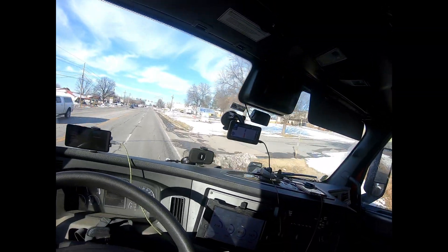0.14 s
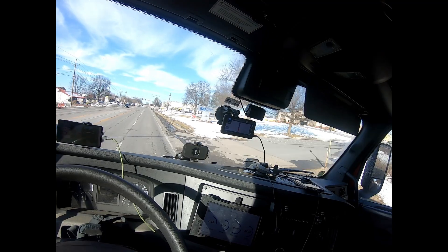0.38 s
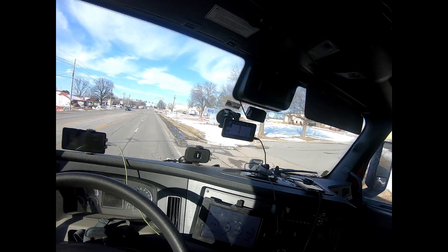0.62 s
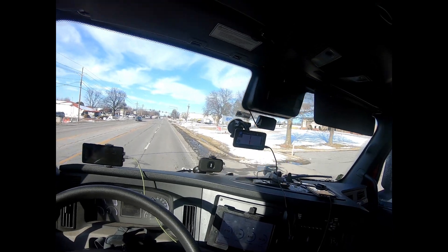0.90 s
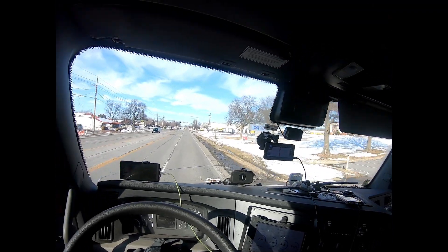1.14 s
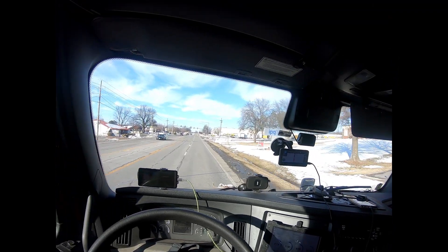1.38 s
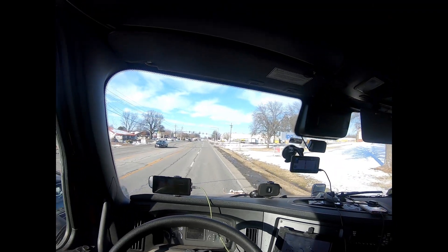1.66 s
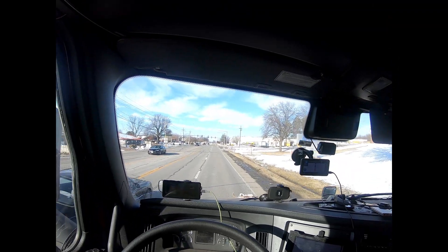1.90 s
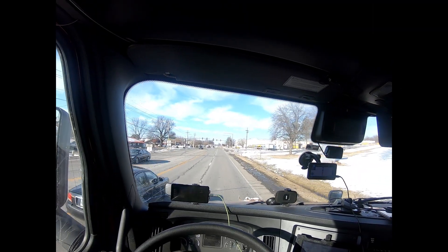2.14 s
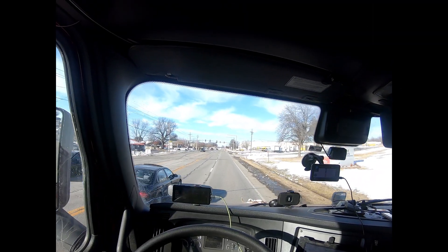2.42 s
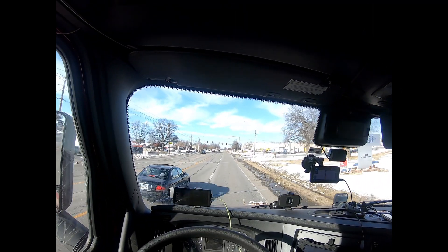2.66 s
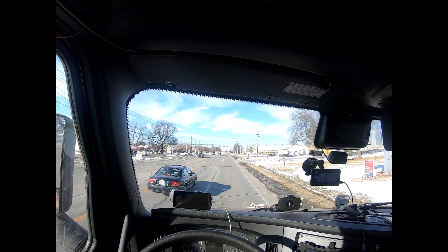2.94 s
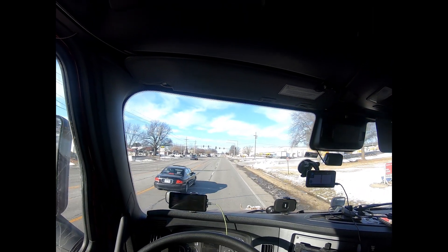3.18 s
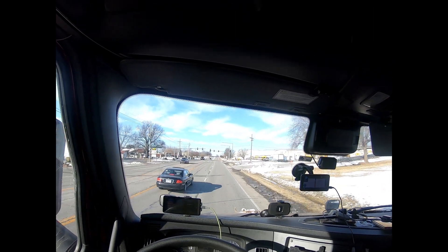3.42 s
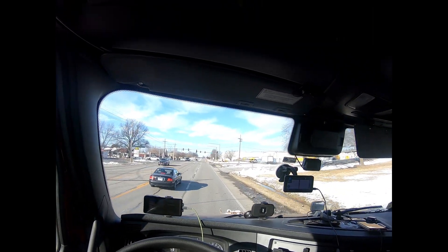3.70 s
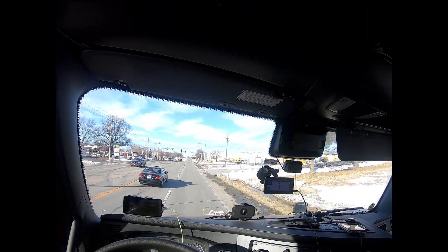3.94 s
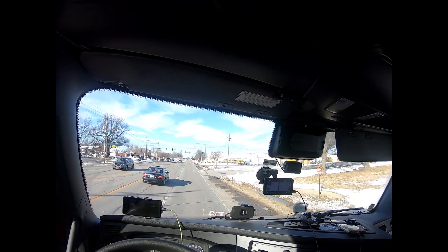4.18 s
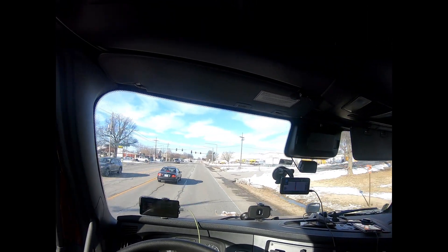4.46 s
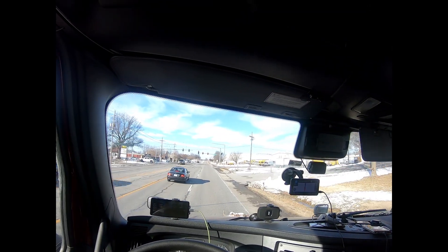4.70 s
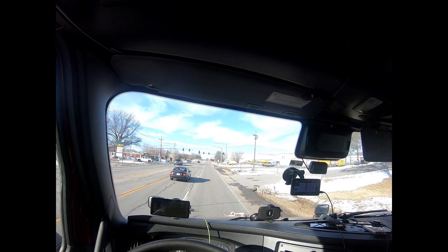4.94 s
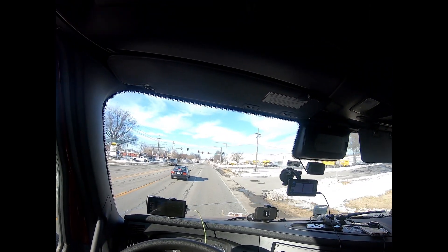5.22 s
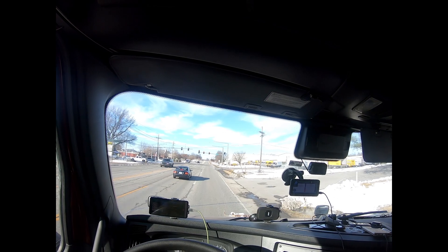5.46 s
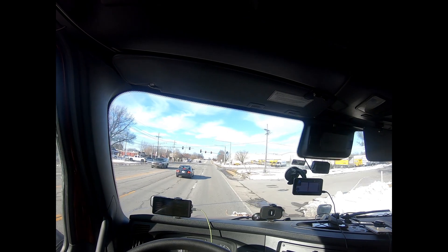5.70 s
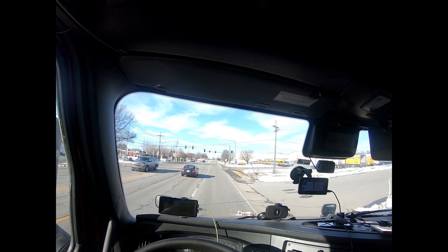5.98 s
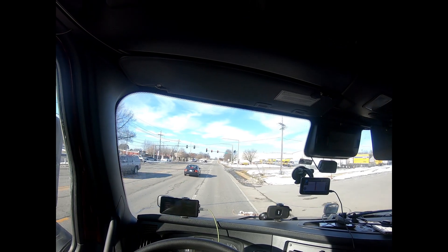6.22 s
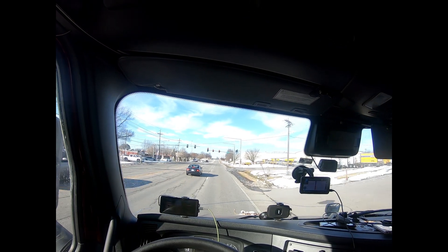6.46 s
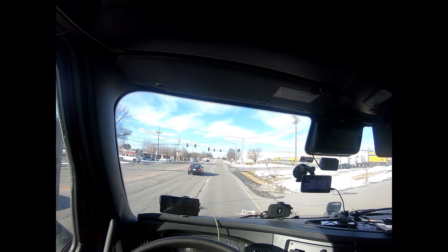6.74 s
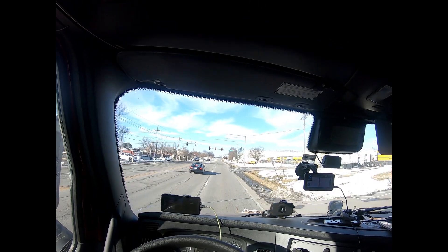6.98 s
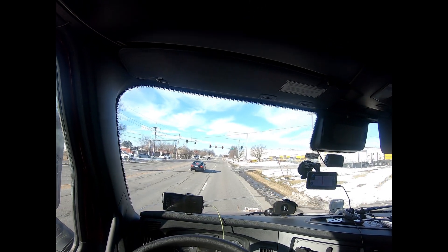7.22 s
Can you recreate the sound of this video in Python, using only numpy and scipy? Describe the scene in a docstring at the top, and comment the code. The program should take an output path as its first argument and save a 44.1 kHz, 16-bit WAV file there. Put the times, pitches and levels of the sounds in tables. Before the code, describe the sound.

Inside a diesel truck's cab on a suburban road, a heavy low boom and engine hum run throughout under muffled tyre roar and thin wind hiss. Rough paving at the start brings a cluster of plastic rattles and dashboard knocks; later ones are sparse. Two cars swell by faintly at about two and six seconds. Close stereo microphone in the cab.

```python
"""The road booms through the floor and seat of a diesel truck's cab, as noise that swells with the paving.
Tyres and traffic roar through the panels and air hisses past the glass, as coloured patchy noise.
Engine firing order, driveline, cab sway and panels hum as wandering sines. Loose trim rattles and the
dashboard knocks, as short blows on resonances with a cab echo. All is heard at two close microphone ports."""
import sys
import numpy as np
from scipy import signal
from scipy.fft import rfft, irfft, next_fast_len
from scipy.io import wavfile
from scipy.ndimage import uniform_filter1d, map_coordinates

SR = 44100
rng = np.random.default_rng(int(sys.argv[2]) if len(sys.argv) > 2 else 0)


def undo_db(level):
    """Turn decibels back into plain size, where 20 dB means ten times bigger."""
    steps = np.asarray(level, float) / 20
    return 10 ** steps


def int16_out(signal):
    """Quantize to a 16-bit WAV file."""
    q = np.round(np.clip(np.atleast_2d(signal).T, -1, 1) * 32767)
    wavfile.write(sys.argv[1], SR, q.astype(np.int16))


N = 324576
TIME_S = np.arange(N) / SR


def unit(x):
    """Scaled to rms 1."""
    return x / np.sqrt(np.mean(x ** 2) + 1e-20)


def along(points, hz):
    """(Hz, value) points read on a log frequency axis."""
    f, v = np.transpose(points)
    return np.interp(np.log(hz + 1), np.log(f + 1), v)


def curves(rows):
    """One value per sample for each column after the time."""
    s, *cols = np.transpose(rows)
    return [np.interp(TIME_S, s, c) for c in cols]


def wobble(knots_per_s):
    """A smooth random curve through normally distributed knots."""
    return map_coordinates(rng.standard_normal(N // 100), [TIME_S * knots_per_s])


def filtered(x, response):
    """x times a complex response of frequency."""
    m = next_fast_len(x.shape[-1] + 8192)
    spectrum = rfft(x, m) * response(np.fft.rfftfreq(m, 1 / SR))
    return irfft(spectrum, m)[..., :x.shape[-1]]


def ring(hz, centre_hz, width_hz):
    """Response of one causal resonance, gain 1 at its centre."""
    return 1j * hz * width_hz / (centre_hz ** 2 - hz ** 2 + 1j * hz * width_hz)


def tone(hz, db, waver_db, drift_rad):
    """A low sine whose size and phase wander a little."""
    level = np.sqrt(2) * undo_db(db + waver_db * wobble(7))
    phase = 2 * np.pi * np.cumsum(hz * np.ones(N)) / SR + drift_rad * wobble(9)
    return level * np.sin(phase)


# Resonances of the cab's air and panels. Each row: centre in Hz, width in Hz, lift of the noise in dB.
CAB_HZ_HZ_DB = [(32, 3.7, -4), (77.2, 2.1, 3), (115, 10, 0), (134, 43, 3.5), (160, 7, 5), (192, 8.4, 2.5),
                (339.3, 21, 2.5), (550, 9.5, 1), (805, 200, -4.5), (3130, 500, 0)]
# Difference between the ports. Each row: Hz, side minus mid in dB.
APART_HZ_DB = [(30, -23.5), (60, -36.5), (130, -30), (190, -15.5), (240, -17), (330, -18.5), (440, -14.5),
               (610, -7), (900, -2.5), (1530, -3), (2430, -3), (3870, -14), (6140, -0.5), (9760, 0.5)]


def rush(spectrum, patchy_db):
    """Diffuse noise, shared part of rms 1, lifted by the cab's resonances, in patches of random gain."""
    z = signal.stft(rng.standard_normal((2, N)), nperseg=512)[2]
    field = uniform_filter1d(rng.standard_normal(z.shape[1:]), size=5, axis=0)
    field = uniform_filter1d(field, size=8, axis=1)
    pair = signal.istft(z * undo_db(patchy_db * unit(field)), nperseg=512)[1][:, :N]

    def mid_side(hz):
        lift_db = sum(db * abs(ring(hz, c, w)) ** 2 for c, w, db in CAB_HZ_HZ_DB)
        colour = undo_db(along(spectrum, hz) + lift_db)
        return colour * [np.ones_like(hz), undo_db(along(APART_HZ_DB, hz))]

    shared, apart = filtered(pair, mid_side)
    return np.array([shared + apart, shared - apart]) / np.std(shared)


# Decay of the cab echo. Each row: Hz, t60 in seconds.
ECHO_HZ_S = [(1000, 0.36), (4000, 0.046), (9000, 0.08)]


def echo():
    """A fresh short cab tail for each port; each frequency dies at its own speed."""
    hz, t, z = signal.stft(rng.standard_normal((2, SR // 5)), SR, nperseg=128)
    decay = undo_db(-60 * t / along(ECHO_HZ_S, hz)[:, None])
    tail = signal.istft(z * decay, SR, nperseg=128)[1]
    return tail / np.linalg.norm(tail[0])


def add_with_echo(out, start_s, blow, wet_db):
    """Adds a blow and its echo in the cab to out, in place."""
    wet = undo_db(wet_db) * signal.fftconvolve(blow, echo(), axes=1)
    later = out[:, round(start_s * SR):]
    later[:, :blow.shape[1]] += blow
    later[:, :wet.shape[1]] += wet


# Two faint panel tones. Each row: time in seconds, lower Hz, lower dB, upper Hz, upper dB.
PANELS_S_HZ_DB_HZ_DB = [(0, 192, -51.5, 340, -41), (.7, 193.8, -38, 331.1, -43),
                        (1.4, 190, -41, 325.1, -43.5), (2.6, 193.5, -46, 341.1, -51),
                        (4.4, 195.5, -57.5, 342, -43.5), (5.2, 190, -55.5, 345.2, -45),
                        (5.8, 191.5, -59, 328.5, -47), (7.36, 192, -56, 335, -52)]


def panels():
    """Side panels sing faintly, gliding a little; the left port leads the right by 0.4 rad."""
    low_hz, low_db, high_hz, high_db = curves(PANELS_S_HZ_DB_HZ_DB)
    low = tone(low_hz, low_db, waver_db=3.5, drift_rad=1.1)
    high = tone(high_hz, high_db, waver_db=3.5, drift_rad=1.5)
    return filtered(low + high, lambda hz: np.exp([[.2j], [-.2j]] * np.ones_like(hz)))


# Cars alongside. Each row: abreast in seconds, roar gained in dB, tyre hiss in dB, half length in seconds.
PASSES_S_DB_DB_S = [(2.097, 2, -59.5, 1), (6.211, 2.5, -52.5, 0.24)]
# Tyre hiss through the door. Each row: Hz, relative dB per Hz.
TYRES_HZ_DB = [(600, -29), (1100, -2.8), (1600, -0.5), (2200, -7.5), (3000, -4.5), (4200, -17), (5500, -42),
               (8000, -120)]


def cars():
    """Tyre hiss swells as each car draws level and fades as it leaves."""
    near = sum(undo_db(hiss_db) / np.sqrt(1 + ((TIME_S - s) / half_s) ** 4)
               for s, _, hiss_db, half_s in PASSES_S_DB_DB_S)
    return near * rush(TYRES_HZ_DB, patchy_db=4.5)


# Level of the air stream. Each row: time in seconds, dB.
STREAM_S_DB = [(0, -48), (.6, -48), (1.05, -47.5), (2.6, -47.5), (7.36, -47.5)]
# Spectrum of the air stream. Each row: Hz, relative dB per Hz.
AIR_HZ_DB = [(700, -12.5), (1200, -6), (1400, -14), (1840, -8), (2080, -6.5), (2280, -9.5), (3270, -10),
             (3650, -13.5), (4360, -13.5), (4860, -17), (9000, -24), (13000, -29)]


def air():
    """A stream hisses past glass and mirrors, flickering a little."""
    level_db = curves(STREAM_S_DB)[0] + 0.42 * wobble(14.0) + 0.23 * wobble(1.8)
    return undo_db(level_db) * rush(AIR_HZ_DB, patchy_db=0.92)


# Dashboard knocks. Each row: start in seconds, relative dB.
KNOCKS_S_DB = [(.266, -42), (.375, -42), (.386, -34.5), (.472, -38), (.688, -35), (.83, -44), (3.003, -43),
               (3.543, -43)]
# Dashboard modes. Each row: Hz, relative dB, t60 in seconds.
DASH_HZ_DB_S = [(866, -4.5, 0.054), (1000, -1.5, 0.048), (1300, 0.5, 0.046), (1580, -2.5, 0.073),
                (1800, -2, 0.047), (2060, -5, .035)]


def dash():
    """A hard short blow rings the dashboard's modes, a little differently each time."""
    out, t = np.zeros((2, N + SR)), np.arange(SR // 8) / SR
    for start_s, db in KNOCKS_S_DB:
        knock = np.zeros(len(t))
        for hz, mode_db, t60_s in DASH_HZ_DB_S:
            decay = undo_db(mode_db + rng.normal(0, 2.5) - 60 * t / t60_s)
            knock += decay * np.sin(2 * np.pi * hz * rng.normal(1, 0.024) * t)
        knock *= undo_db(db) * (1 - np.exp(-t / .0008))
        add_with_echo(out, start_s, np.array([knock, knock]), wet_db=0.5)
    return out[:, :N]


# Trim rattles. Each row: start in seconds, relative dB of five parts from low to high, length in seconds.
RATTLES_S_5DB_S = [(0.098, -64, -55, -59, -52, -48.5, 0.018), (0.303, -38, -32.5, -38, -36.5, -39.5, .022),
                   (0.387, -39, -46, -46, -44, -48, 0.011), (0.425, -63, -60, -56, -54, -53, .04),
                   (0.486, -34.5, -36.5, -40, -37, -40.5, 0.027), (1.765, -40, -41, -41, -40.5, -48, 0.021),
                   (3.001, -41, -42, -34, -43.5, -49, 0.013), (3.541, -41.5, -43, -35.5, -45, -60, 0.012),
                   (5.786, -50, -49, -50, -49.5, -51, 0.037), (6.326, -56, -55, -36, -55, -55, 0.011),
                   (6.354, -61, -57, -56, -49, -46.5, 0.017), (6.926, -57, -49, -41, -54, -64, 0.015)]
# Trim modes. Each row: part number, centre in Hz, width in Hz, relative dB.
TRIM_PART_HZ_HZ_DB = [(0, 1123, 594, -2.5), (0, 1570, 550, 0), (0, 2050, 491.8, -2.5), (1, 2590, 600, -1.3),
                      (1, 3000, 496, -0.5), (2, 3230, 600, 0.5), (3, 3990, 700, -2.8), (3, 4580, 700, -3.5),
                      (3, 5250, 700, -2.8), (3, 6480, 1300, -10.5), (4, 7470, 880, -2),
                      (4, 8140, 990, -3.5), (4, 9060, 1300, -3.5), (4, 11300, 1800, -6)]


def trim():
    """Each jolt sets off a short dense chatter of tiny contacts that rings the trim and fills the cab."""
    out, t = np.zeros((2, N + SR)), np.arange(SR // 8) / SR
    for start_s, *part_db, length_s in RATTLES_S_5DB_S:
        contacts = unit(rng.standard_normal(len(t)) * undo_db(5.0 * rng.standard_normal(len(t))))
        shake = (1 - np.exp(-t / 0.0034)) * np.exp(-(t / length_s) ** 1.18)

        def ports(hz):
            modes = 0
            for k, (part, centre_hz, width_hz, db) in enumerate(TRIM_PART_HZ_HZ_DB):
                # squared for steep skirts; alternate signs fill the gaps between neighbours
                modes = modes + (-1) ** k * undo_db(part_db[int(part)] + db) * ring(hz, centre_hz, width_hz) ** 2
            return modes * np.exp([[-1j], [1j]] * hz * np.pi * 2e-5)  # right port leads slightly

        rattle = filtered(contacts * shake, ports) * undo_db([[11.5], [12.5]])  # trim sits a little to the right
        add_with_echo(out, start_s, rattle, wet_db=-3.0)
    return out[:, :N]


# Driveline hum. Each row: time in seconds, Hz, dB.
HUM_S_HZ_DB = [(0, 133.1, -30.5), (.5, 135, -54.5), (1.7, 142.7, -34), (2.3, 143.2, -34), (2.9, 138.8, -29),
               (4.2, 131.6, -30), (4.8, 134.8, -39), (6.2, 134, -35), (7.36, 136.2, -24)]


def driveline():
    """Driveline hum stands out of the boom, a sine of wandering size and phase."""
    return tone(*curves(HUM_S_HZ_DB), waver_db=3.5, drift_rad=2.2)


# Engine firing order. Each row: time in seconds, Hz, dB.
FIRING_S_HZ_DB = [(0, 53.1, -27.5), (.5, 51.3, -41.5), (1.7, 54.77, -27.5), (2.4, 57.9, -26),
                  (3.8, 54.63, -28), (4.8, 50.5, -32.5), (5.6, 48.67, -33), (6.1, 52.9, -36),
                  (6.3, 57, -23), (7, 55.4, -24.5), (7.36, 51, -54.5)]


def engine():
    """Firing order hums, slightly fuzzy since no two firings are alike."""
    return tone(*curves(FIRING_S_HZ_DB), waver_db=3, drift_rad=.8)


def heave():
    """The cab's lower mode, steady over the first bump, then dying away."""
    hold_s, loss_db_per_s = .4, 54.5
    level_db = -19 - loss_db_per_s * np.maximum(TIME_S - hold_s, 0)
    return tone(19.6, level_db, waver_db=.6, drift_rad=.2)


# Roughness of the paving, shared by the sway, roar, drone and boom.
# Each row: time in seconds, dB over smooth road.
PAVING_S_DB = [(0, -1), (.12, 7), (.22, 2), (.33, 5.5), (.5, 7), (.75, 1.5), (1.05, -1), (1.35, 1),
               (1.75, -2.5), (2.1, -1.5), (2.5, 2), (2.95, 4), (3.3, 0.5), (4.7, 2), (5.4, -5.5), (6.2, -5),
               (6.6, 4), (7.1, -1.5), (7.36, 6)]
# Pitch of the sway. Each row: time in seconds, Hz.
SWAY_S_HZ = [(0, 34.5), (.5, 32.5), (1.3, 35), (2.2, 30), (4, 29.8), (5.5, 32), (7.36, 29.3)]


def sway():
    """The whole cab sways at a low gliding pitch, harder on rough paving."""
    smooth_db, db_per_rough_db = -30.5, 2.48
    level_db = smooth_db + db_per_rough_db * curves(PAVING_S_DB)[0]
    return tone(*curves(SWAY_S_HZ), level_db, waver_db=2.5, drift_rad=1.3)


# Level of the tread's whine. Each row: time in seconds, dB.
TREAD_S_DB = [(0, -45), (.5, -43), (.8, -46.5), (1.27, -42), (2.1, -52), (5.7, -56.5), (6.25, -58),
              (6.6, -61)]
# The tread's band. Each row: Hz, relative dB per Hz.
WHINE_HZ_DB = [(600, -45.5), (780, 5.5), (860, 10), (950, -1.5), (1200, -38.5)]


def tread():
    """Tyre tread whines as a narrow band of noise."""
    return undo_db(curves(TREAD_S_DB)[0]) * rush(WHINE_HZ_DB, patchy_db=2.5)


# Spectrum of the roar. Each row: Hz, relative dB per Hz.
ROAR_HZ_DB = [(120, -35.5), (200, -10.5), (286, -1), (314, -0.5), (344, -6), (399, -6.5), (603, -5.5),
              (661, -11.5), (752, -5), (855, -11), (1800, -25), (2340, -59.5), (3960, -120)]


def roar():
    """Tyres and traffic roar through the panels, louder on rough paving and beside passing cars."""
    smooth_db, db_per_rough_db = -36.5, 0.25
    cars_db = sum(db / (1 + ((TIME_S - s) / half_s) ** 2) for s, db, _, half_s in PASSES_S_DB_DB_S)
    level_db = smooth_db + cars_db + db_per_rough_db * curves(PAVING_S_DB)[0] + 0.8 * wobble(3.36)
    return undo_db(level_db) * rush(ROAR_HZ_DB, patchy_db=0.88)


# Surges of the drone. Each row: time in seconds, dB gained.
SURGE_S_DB = [(0, 1.5), (.7, -3), (1.5, 0.5), (2.4, 0), (3.8, -1), (4.8, 1), (5.4, 1), (6.2, 1), (6.8, -2),
              (7.36, -1.5)]
# Spectrum of the drone. Each row: Hz, relative dB per Hz.
DRONE_HZ_DB = [(35, -37.5), (60, 0.5), (102, -2.5), (135, -4.5), (147, -8.5), (183, -13.5), (215, -15),
               (260, -18), (340, -38), (570, -120)]


def drone():
    """A low road drone, surging slowly and barely louder on rough paving."""
    smooth_db, db_per_rough_db = -24.5, 0.12
    level_db = smooth_db + db_per_rough_db * curves(PAVING_S_DB)[0]
    level_db = level_db + curves(SURGE_S_DB)[0] + 1.24 * wobble(6.0)
    return undo_db(level_db) * rush(DRONE_HZ_DB, patchy_db=1.0)


# Spectrum of the boom. Each row: Hz, relative dB per Hz.
BOOM_HZ_DB = [(5.9, -34), (10, -2), (38, -1), (65, -7.5), (90, -10), (120, -28.5), (200, -120)]


def boom():
    """Rough paving shakes the floor and seat in lumps of deep noise."""
    smooth_db, db_per_rough_db = -23.5, 0.74
    level_db = smooth_db + db_per_rough_db * curves(PAVING_S_DB)[0] + 1.7 * wobble(8.4)
    return undo_db(level_db) * rush(BOOM_HZ_DB, patchy_db=0.24)


def scene():
    """Everything that reaches the two ports."""
    background = panels() + cars() + air()
    loose = dash() + trim()
    hums = driveline() + engine() + heave() + sway()
    return background + loose + hums + tread() + roar() + drone() + boom()


def roll_off(x):
    """The treble ends steeply here."""
    return signal.sosfilt(signal.butter(12, 12750, fs=SR, output="sos"), x)


# Microphone's top end. Each row: Hz, gain in dB.
MIC_HZ_DB = [(8600, 1), (9500, -4.5), (10300, -15), (11500, -20), (13000, -21)]
# Level between the ports. Each row: Hz, left minus right in dB.
TILT_HZ_DB = [(30, -1), (80, -0.3), (150, -0.09), (290, -1.3), (600, -0.41), (1100, 0.59), (4700, 0.15),
              (7000, -.9), (9800, 0)]
# Phase between the ports. Each row: Hz, lead of the left in radians.
LEAD_HZ_RAD = [(500, 0), (950, -0.6), (2000, 0), (5500, 1.2), (8300, 3)]


def record(dry):
    """The ports differ in phase and level; a slow gain control turns down what stays loud."""
    side = np.array([[1], [-1]])

    def ports(hz):
        gain_db = along(MIC_HZ_DB, hz) + side * along(TILT_HZ_DB, hz) / 2
        return undo_db(gain_db) * np.exp(side * .5j * along(LEAD_HZ_RAD, hz))

    x = filtered(dry, ports)
    threshold_db, start_db, smoothing_s = -23.52, -17.5, .4
    keep = np.exp(-1 / (smoothing_s * SR))
    power = np.mean(x ** 2, axis=0)
    held = signal.lfilter([1 - keep], [1, -keep], power, zi=[undo_db(2 * start_db) * keep])[0]
    over_db = np.maximum(10 * np.log10(held + 1e-12) - threshold_db, 0)
    return roll_off(x * undo_db(-.6 * over_db))


dry = scene()
out = record(dry)
int16_out(out)
```